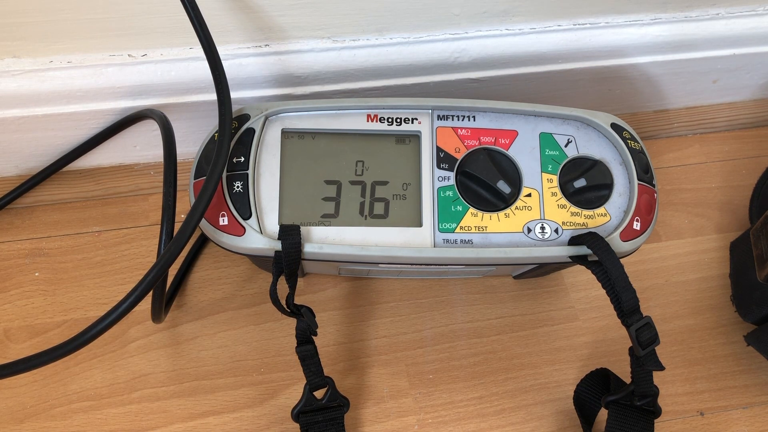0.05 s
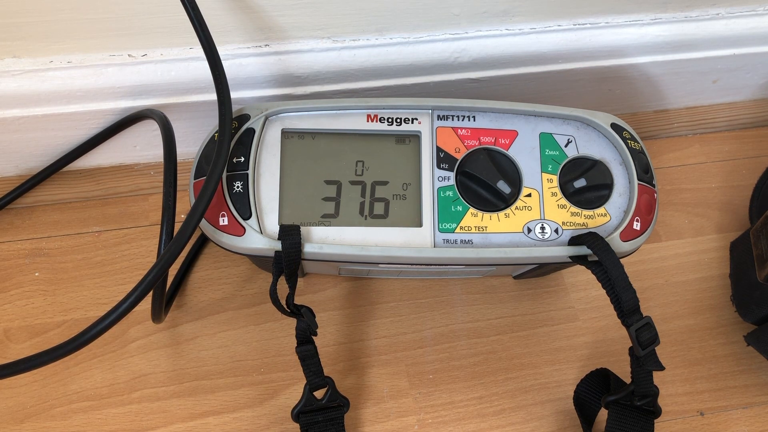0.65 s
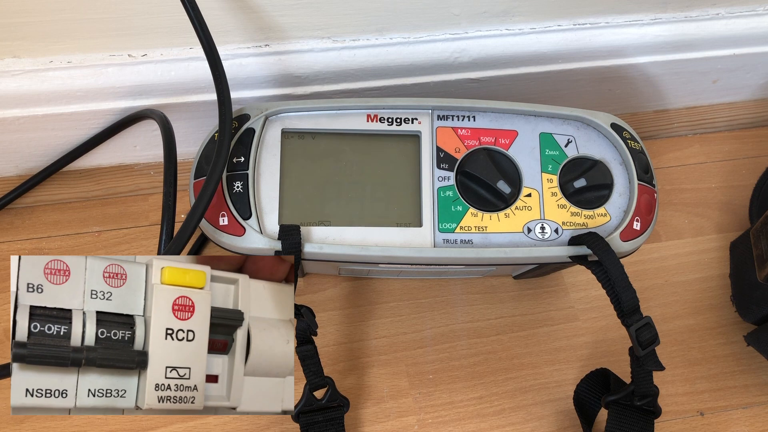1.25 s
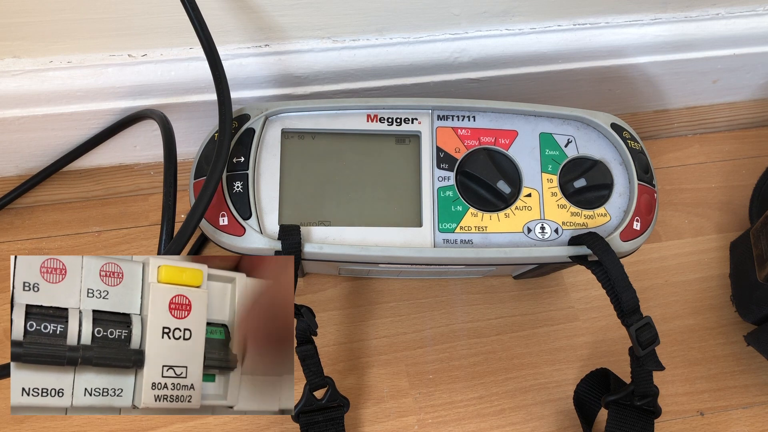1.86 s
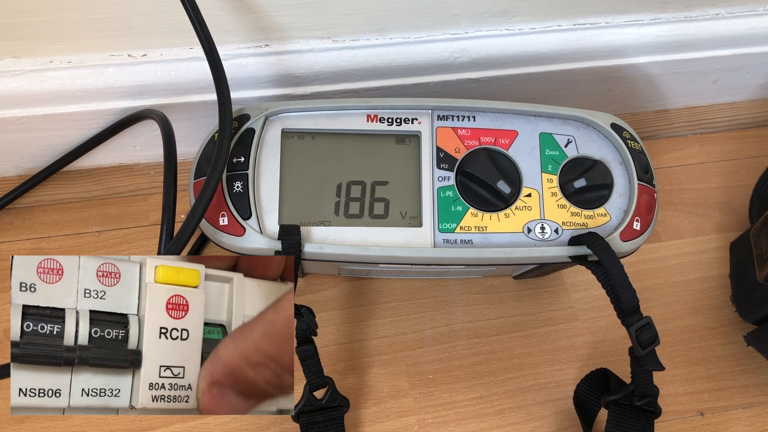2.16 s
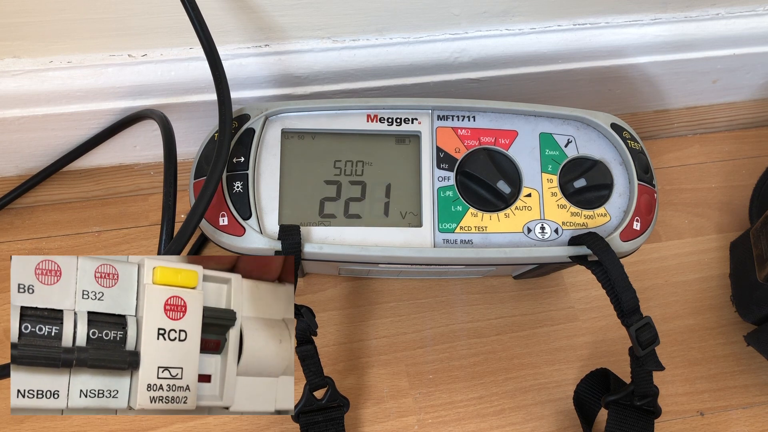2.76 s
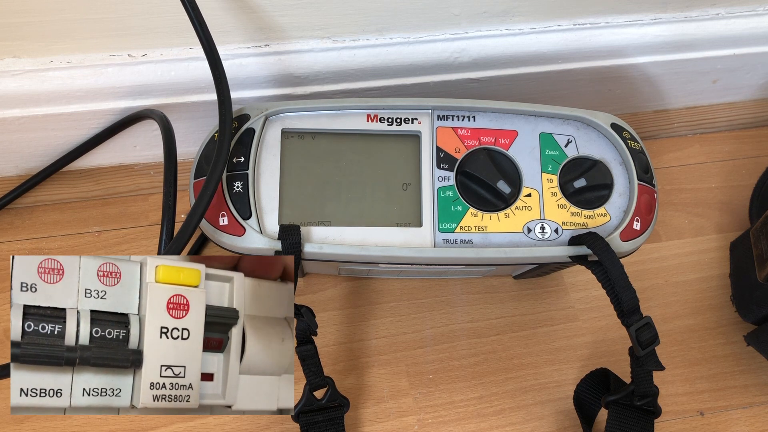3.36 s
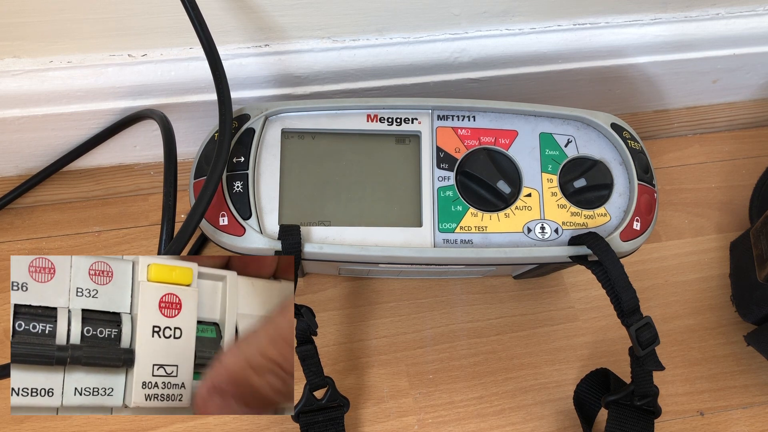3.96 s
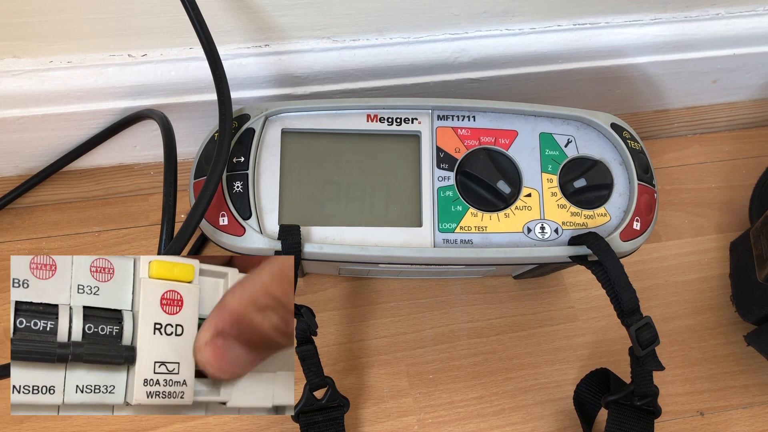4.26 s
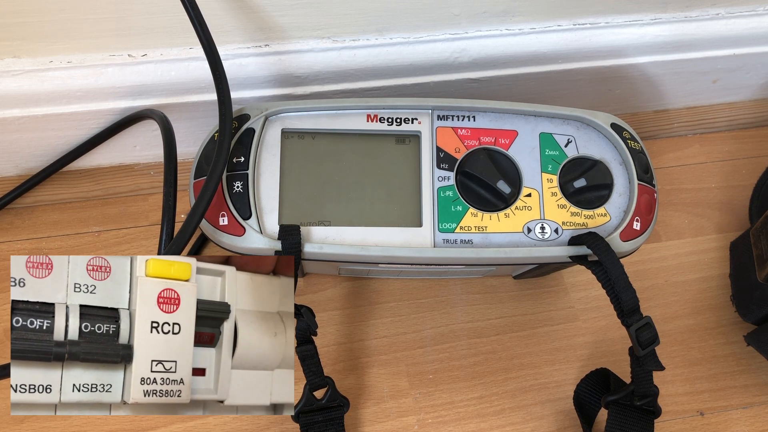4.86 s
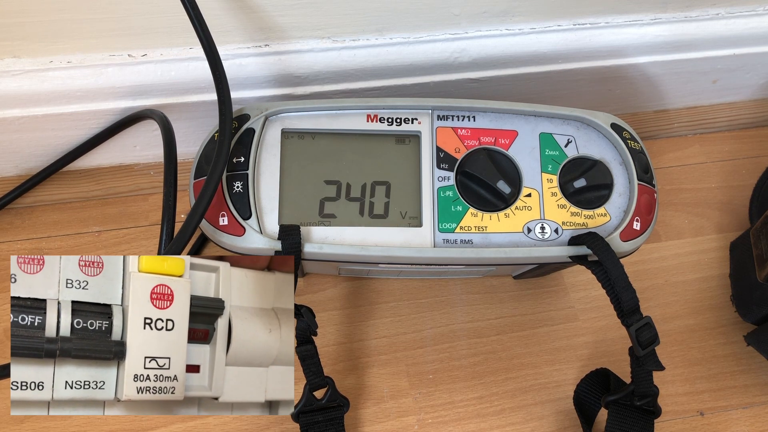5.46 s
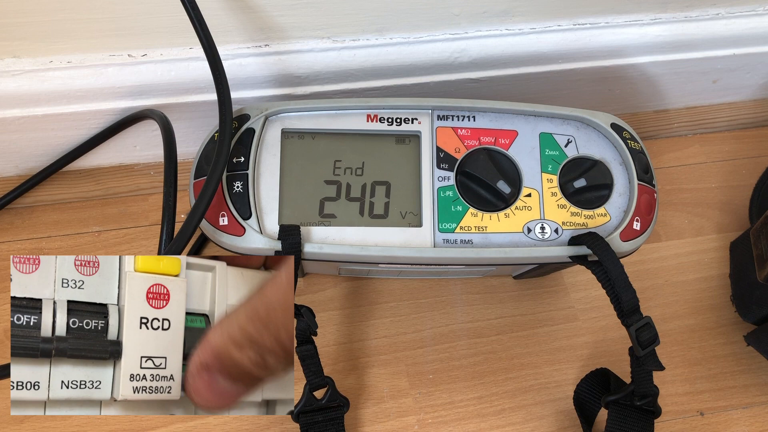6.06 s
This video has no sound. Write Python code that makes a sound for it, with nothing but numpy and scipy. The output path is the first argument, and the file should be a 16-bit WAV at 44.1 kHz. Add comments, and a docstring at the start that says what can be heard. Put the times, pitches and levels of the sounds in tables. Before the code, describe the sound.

In a bare, echoing room, a circuit breaker lever clicks and snaps on, then trips with a hard, ringing clack. It trips three times in all, and each time a hand clicks the lever down and snaps it back on. An electrical tester ticks softly near the microphone before each trip, while the breaker is some way off. Dull floor bumps come near the end, over faint hiss.

```python
"""Three hard clacks ring through a bare room: a residual-current breaker trips under test.
Its sprung contacts fly open and shake the wall; a hand clicks the lever down and snaps it back on.
The tester's relay ticks close by before each trip; the breaker is some way off.
A vehicle drones faintly outside. A body shifts on the floor and a sleeve rustles over steady hiss."""
import sys
import numpy as np
from scipy import signal
from scipy.fft import rfft, irfft
from scipy.io import wavfile

SR = 44100
rng = np.random.default_rng(int(sys.argv[2]) if len(sys.argv) > 2 else 0)


def bounce(signal):
    """Save signal as a 16-bit WAV file at the path given by the first command-line argument."""
    frames = np.transpose(np.atleast_2d(signal))
    limited = np.clip(frames, -1, 1)
    pcm = np.round(limited * 32767).astype(np.int16)
    wavfile.write(sys.argv[1], SR, pcm)


N = 269627

# Blows. Each row: start in seconds, level in dB, tilt in dB/octave, main ring in Hz, its lift in dB.
TRIPS = [(1.2434, -6, 0, 8640, 2.5), (3.2220, -6, 0, 9600, 1.5), (4.3270, -6.5, -0.13, 6370, 3.5)]  # contacts fly open
RESETS = [(.6072, -18, 0.9, 5270, 3.5), (2.0712, -19, 1.35, 4000, -1.5), (4.0910, -20, 0.2, 6650, 6.5),
          (5.1927, -21, 0, 2160, 3.5)]  # lever snaps on
LATCHES = [(0.258, -31, 0, 6350, 5), (1.829, -35, 0, 6400, 5), (3.715, -30, 0.012, 6500, 4),
           (4.935, -28.5, 0.007, 6460, 5)]  # lever pressed down until the latch catches
# Breaker's tensioned springs. Each row: frequency in Hz, level in dB, t60 in seconds.
SPRING_MODES = [(2223, -57.5, 0.5), (2236, -40, 0.56), (2373, -43, 0.54), (3485, -51, 0.78),
                (3780, -48.5, 0.76), (4030, -49.5, 0.58), (3940, -45.5, 0.74), (4030, -47, 1.0),
                (4740, -47, .9), (6600, -46.5, 0.99)]
# Room path of lever clicks and floor bumps: direct, early and tail level in dB.
FAR_PATH_DB = (-14, -8.5, -3)


def breaker_trips():
    """The latch slips, lets go, and the sprung arm hits its stop; the frame rings on."""
    # Clack spectrum. Each row: frequency in Hz, level in dB.
    colour = [(25, -44.5), (60, -11), (120, -8.5), (190, -12), (400, -14), (600, -9.5), (780, -14.5),
              (1050, -1), (1400, 3), (2800, -3), (6300, 0.5), (9000, -1), (13000, -5), (15500, 0.5)]
    # Case resonances. Each row: frequency in Hz, width in Hz, lift in dB.
    case_modes = [(480, 50, 5), (1264, 30, 3), (1421, 25, 4), (1670, 25, 4), (1838, 25, 3), (2010, 80, 3),
                  (2260, 180, -4), (2560, 200, 4), (2935, 50, 4), (3080, 260, -4), (3302, 30, 5),
                  (3389, 45, 5), (3680, 130, 3), (4380, 300, -2), (4820, 110, 4), (5190, 100, 3),
                  (5583, 35, 4), (5764, 35, 3), (5965, 70, 4), (6335, 40, 4), (7208, 50, 5),
                  (7550, 450, -4), (7982, 50, 6), (8490, 100, 4), (9250, 80, 5), (11850, 450, 4),
                  (13200, 900, -2), (14354, 30, 6)]
    # Slip, release, stop. Each row: delay in seconds, level in dB.
    contacts = [(-.0055, -5.5), (-.003, 1.5), (0, 10.5)]
    # Frame modes. Each row: frequency in Hz, level in dB, t60 in seconds.
    frame_modes = [(1421, -51, 1.2), (1490, -54, 1.2), (1670, -51, 1.2), (1838, -54, 1.1), (1986, -52, 1.1),
                   (2034, -52, 1.1), (2590, -50, 1.2), (3389, -50, 1.0), (3720, -50, 1.2), (5583, -49, .85),
                   (6335, -49, .8), (7984, -51, .65)]
    path_db = (-13, -5, -1.5)  # direct, early, tail
    blows = clacks(TRIPS, colour, case_modes, contacts, path_db, ring_width_hz=940)
    return blows + ring(TRIPS, frame_modes, spread_db=6.0)


def wall_shake(swell_s=0.038):
    """Each trip shakes the wall; its low modes swell and die away."""
    # Wall modes. Each row: frequency in Hz, level in dB.
    modes = [(58, -58.5), (92, -49.5), (108, -58), (128, -44.5)]
    out, t = np.zeros(N), np.arange(SR) / SR
    envelope = (t / swell_s) ** 2 * np.exp(-t / swell_s)
    for start_s, db, *_ in TRIPS:
        for (hz, mode_db), cycles in zip(modes, rng.random(len(modes))):
            add(out, start_s, amp(db + mode_db) * envelope * np.sin(2 * np.pi * (hz * t + cycles)))
    return out


def breaker_resets():
    """The contacts snap shut; the springs ring and the enclosure knocks hollow under the thumb."""
    # Snap spectrum. Each row: frequency in Hz, level in dB.
    colour = [(25, -22.5), (55, 4), (110, 7), (220, -6.5), (480, 0.5), (800, -8.5), (1100, -1.5),
              (1500, -4.5), (2300, -1.5), (4000, 0.5), (5800, -3), (8200, -6), (10800, -5), (15500, -11)]
    # Case resonances. Each row: frequency in Hz, width in Hz, lift in dB.
    case_modes = [(470, 70, 4), (1080, 150, 2), (1590, 140, -4), (2280, 260, 4), (2660, 260, -7),
                  (2960, 60, 7), (3130, 220, -6), (3480, 70, 4), (3750, 220, 4), (4070, 70, 3),
                  (4300, 60, 4), (4500, 200, -4), (4740, 90, 6), (5420, 250, -3), (6210, 50, 4),
                  (6560, 100, 3), (7210, 90, 6), (10350, 400, 2)]
    # One strike: delay in seconds, level in dB.
    contacts = [(0.00054, 10.57)]
    # Enclosure modes. Each row: frequency in Hz, level in dB, t60 in seconds.
    hollow_modes = [(435, -42.5, 0.49), (474.5, -40, 0.35), (510, -56.5, .55), (617, -46, 0.8),
                    (1073, -36, 0.4)]
    path_db = (-12, -8.5, -2)  # direct, early, tail
    snaps = clacks(RESETS, colour, case_modes, contacts, path_db, ring_width_hz=470)
    springs = ring(RESETS, SPRING_MODES, spread_db=-0.5)
    return snaps + springs + ring(RESETS, hollow_modes, spread_db=0.5)


def lever_clicks():
    """A finger takes up the lever's slack, then latches it, which rings the springs."""
    # Slack taken up. Columns as in TRIPS.
    nudges = [(.112, -37, 0, 10300, 8.8), (1.685, -34, 0, 10530, 7.4), (3.606, -36, 0, 10400, 8.9),
              (4.848, -32, 0.012, 6540, 4)]
    # Click spectrum. Each row: frequency in Hz, level in dB.
    colour = [(200, -3.5), (1000, -5.5), (2500, -2.5), (4500, -2), (7000, -5), (9000, -4), (12000, -7.5),
              (15500, -5.5)]
    # Lever resonances. Each row: frequency in Hz, width in Hz, lift in dB.
    modes = [(2215, 150, 1), (3740, 250, -4), (5090, 250, 2.5), (7000, 330, 6)]
    # Double strike. Each row: delay in seconds, level in dB.
    contacts = [(0, 5.4), (.005, 5.4)]
    clicks = clacks(nudges + LATCHES, colour, modes, contacts, FAR_PATH_DB, ring_width_hz=740)
    return clicks + ring(LATCHES, SPRING_MODES, spread_db=-0.5)


def tester_relay(spring_gain_db=3):
    """A near, dry tick: the armature bounces and leaves its spring ringing."""
    # Relay ticks. Columns as in TRIPS.
    blows = [(.9720, -44.5, 0.0097, 7500, 6), (2.9632, -44, 0.0069, 7223, 6), (4.0647, -44.5, 0, 7400, 6)]
    # Tick spectrum. Each row: frequency in Hz, level in dB.
    colour = [(300, -17.5), (1000, -5.5), (1900, 9), (3500, 2), (7000, -1.5), (9000, -6), (13000, -7),
              (15500, -16.5)]
    # Armature bounce. Each row: delay in seconds, level in dB.
    contacts = [(0, 5.1), (.002, 12)]
    # Spring modes. Each row: frequency in Hz, level in dB, t60 in seconds.
    spring = [(7250, -34, .42), (7470, -32, .45), (7610, -33, .42), (7830, -33, .42), (13050, -37, .25)]
    path_db = (2.5, -4, -3)  # direct, early, tail
    ticks = clacks(blows, colour, [], contacts, path_db, ring_width_hz=600)
    return ticks + amp(spring_gain_db) * ring(blows, spring, spread_db=0.5)


def floor_bumps(width_hz=60, lift_db=9):
    """A body shifts on the floor; dull thuds swell in the room's low modes."""
    # Each row: start in seconds, level in dB, boom in Hz.
    bumps = [(4.599, -29, 52), (5.83, -24, 132)]
    # Thud spectrum. Each row: frequency in Hz, level in dB.
    colour = [(25, -16), (52, -1), (90, -2.5), (135, -7.5), (200, -17), (500, -16.5), (2000, -36),
              (15000, -64)]
    out = np.zeros(N)
    for start_s, db, boom_hz in bumps:
        thud = impact(colour, [(boom_hz, width_hz, lift_db)], tilt_db=0)
        add(out, start_s, amp(db) * signal.fftconvolve(thud, room(*FAR_PATH_DB)))
    return out


def vehicle(waver=0.014, flutter_db=2.5, rumble_db=-12, overtone_db=-7.5, octave_db_per_db=0.4):
    """An engine passes beyond the walls: exhaust note, its octave, a drone and tyre noise."""
    # Engine pulls, then coasts. Each row: time in seconds, firing rate in Hz.
    firing = [(0.6, 42.2), (2.32, 47.8), (2.67, 56.0), (3.78, 66.1), (4.18, 59.87), (5.1, 40.72)]
    # Exhaust follows the throttle. Each row: time in seconds, level in dB.
    throttle = [(0.0, -72), (0.36, -64.5), (0.97, -71), (2.62, -73), (2.82, -64), (3.49, -79.5),
                (3.68, -60), (4.37, -60), (5.5, -78), (6.11, -80)]
    # Spectra. Each row: frequency in Hz, level in dB.
    rumble = [(25, -32), (42, -0.5), (70, -5), (140, -2.5), (300, -32.5), (1000, -81.5)]  # exhaust
    boom = [(25, -30), (110, -12), (160, -5), (180, -9), (205, 1), (228, -5), (255, 0), (275, -2), (302, 3),
            (325, -7), (400, -11), (600, -13), (1200, -35)]  # drone in the room's low modes
    tyres = [(200, -22), (400, 3), (750, -2.5), (1100, 0), (1700, 4), (2700, -3), (4000, -8),
             (15000, -61.5)]
    drift = [(4, 0), (12, -14), (40, -100)]  # slow wander of pitch and level
    firing_hz, exhaust_db = curve(firing), curve(throttle)
    phase = 2 * np.pi * np.cumsum(firing_hz * (1 + waver * noise(drift))) / SR

    def tone(order):
        """A multiple of the firing rate, fluttering in level."""
        return np.sqrt(2) * np.sin(order * phase) * amp(flutter_db * noise(drift))

    exhaust = amp(exhaust_db) * (tone(1) + amp(rumble_db) * noise(rumble))
    room_mode_db = resonance_db(2 * firing_hz, centre_hz=120, width_hz=12, lift_db=10)
    octave = amp(room_mode_db + octave_db_per_db * (exhaust_db - exhaust_db.max())) * tone(2)
    overtones = sum(amp(at_hz(boom, order * firing_hz)) * tone(order) for order in range(3, 8))
    drone = noise(boom) + amp(overtone_db) * overtones
    return (exhaust
            + octave * passing(peak_s=3.2, db=-64, approach_s=0.14, retreat_s=0.22)
            + drone * passing(peak_s=2.55, db=-69.5, approach_s=0.8, retreat_s=0.7)
            + noise(tyres) * passing(peak_s=3.4, db=-66.5, approach_s=1.1, retreat_s=0.62))


def sleeve_rustle():
    """Cloth noise swells and fades with each brush of a sleeve."""
    # Each row: peak time in seconds, level in dB, half length in seconds.
    brushes = [(0.153, -68.5, 0.36), (6.12, -65.5, 0.2)]
    # Cloth spectrum. Each row: frequency in Hz, level in dB.
    colour = [(100, 13.5), (700, 9.5), (2000, 6.5), (5000, 1), (10000, -6), (15500, -10)]
    t = np.arange(N) / SR
    envelope = sum(amp(db) * np.exp(-((t - peak_s) / half_s) ** 2) for peak_s, db, half_s in brushes)
    return envelope * noise(colour)


def hiss(level_db=-78):
    """Steady, bass-heavy background noise."""
    # Hiss spectrum. Each row: frequency in Hz, level in dB.
    colour = [(20, -24), (45, 6), (90, 6.5), (130, 17.5), (175, 4), (500, 1.5), (750, 3), (1100, -5.5),
              (3000, -11.5), (6000, -9.5), (15000, -17.5)]
    return amp(level_db) * noise(colour)


def clacks(blows, colour, modes, contacts, path_db, ring_width_hz):
    """Each blow strikes a body once per contact and sounds through the room."""
    out = np.zeros(N)
    for start_s, db, tilt_db, ring_hz, lift_db in blows:
        click = impact(colour, modes + [(ring_hz, ring_width_hz, lift_db)], tilt_db)
        for delay_s, contact_db in contacts:
            add(out, start_s + delay_s, amp(db + contact_db) * signal.fftconvolve(click, room(*path_db)))
    return out


def impact(colour, modes, tilt_db, size=4096):
    """Minimum-phase click: a broad spectrum, tilted per octave and lifted at each resonance."""
    hz = np.fft.rfftfreq(size, 1 / SR)
    db = at_hz(colour, hz) + tilt_db * np.log2((hz + 300) / 4000)
    db += sum(resonance_db(hz, *mode) for mode in modes)
    log_gain = np.log(amp(np.r_[db, db[-2:0:-1]]))
    spectrum = np.exp(np.conj(signal.hilbert(log_gain)))
    return unit(np.fft.ifft(spectrum).real)


def ring(blows, modes, spread_db, rise_s=0.012):
    """Decaying modes after each blow, random in level and phase."""
    out, t = np.zeros(N), np.arange(SR) / SR
    swell = 1 - np.exp(-t / rise_s)
    for start_s, db, *_ in blows:
        for (hz, mode_db, t60_s), (offset, phase) in zip(modes, rng.uniform(-1.1, 1, (len(modes), 2))):
            envelope = swell * amp(db + mode_db + spread_db * offset - 60 * t / t60_s)
            add(out, start_s, envelope * np.sin(2 * np.pi * hz * t + np.pi * phase))
    return out


def room(direct_db, early_db, tail_db, first_s=0.0044, last_s=0.016, beam_hz=1500):
    """Impulse response: direct sound, near-wall reflections, a tail whose treble dies first."""
    # Room decay. Each row: frequency in Hz, t60 in seconds.
    t60_s = [(100, 1.4), (500, 0.77), (1400, 1.18), (2700, 1.23), (4000, 1.007), (6000, 0.85), (8000, 0.68),
             (11000, 0.54), (15500, 0.37)]
    t = np.arange(3 * SR // 2) / SR
    hz, frame_s, bands = signal.stft(rng.standard_normal(len(t)), SR, nperseg=256)
    build = (1 - np.exp(-frame_s / (0.0018 + 2.2 / (hz[:, None] + 50)))) ** 2  # low modes fill slowly
    decay = amp(-60 * frame_s / at_hz(t60_s, hz)[:, None])
    tail = signal.istft(bands * build * decay, SR, nperseg=256)[1][:len(t)]
    early = rng.standard_normal(len(t)) * ((t > first_s) & (t < last_s))
    direct = rng.standard_normal(len(t)) * np.exp(-t / 0.0021)  # smeared by the source's box
    near = amp(direct_db) * unit(direct) + amp(early_db) * unit(early)
    # a small source beams its treble; its bass arrives through the tail
    near = signal.lfilter(*signal.butter(1, beam_hz, "high", fs=SR), near)
    return near + amp(tail_db) * unit(tail)


def passing(peak_s, db, approach_s, retreat_s):
    """Gain of a source going by on a straight road: one over distance."""
    t = np.arange(N) / SR - peak_s
    return amp(db) / np.hypot(1, t / np.where(t < 0, approach_s, retreat_s))


def resonance_db(hz, centre_hz, width_hz, lift_db):
    """Bell-shaped lift around one mode."""
    return lift_db / (1 + (2 * (hz - centre_hz) / width_hz) ** 2)


def noise(colour):
    """Unit-rms noise with a given spectrum."""
    shaped = rfft(rng.standard_normal(N)) * amp(at_hz(colour, np.fft.rfftfreq(N, 1 / SR)))
    return unit(irfft(shaped, N)) * np.sqrt(N)


def amp(db):
    """Decibels to gain."""
    return 10 ** (np.asarray(db) / 20)


def unit(x):
    """Scales to unit energy."""
    return x / np.sqrt(np.sum(x ** 2) + 1e-20)


def at_hz(points, hz):
    """Interpolates a table over log frequency."""
    points_hz, values = np.transpose(points)
    return np.interp(np.log(hz + 1), np.log(points_hz + 1), values)


def curve(points):
    """Interpolates a timed table, one value per sample."""
    return np.interp(np.arange(N) / SR, *np.transpose(points))


def add(mix, start_s, sound):
    """Mixes a sound in at start_s."""
    part = mix[round(start_s * SR):][:len(sound)]
    part += sound[:len(part)]


def scene():
    """All sources in mono, heard from beside the tester."""
    breaker = breaker_trips() + wall_shake() + breaker_resets() + lever_clicks()
    return (breaker + tester_relay() + floor_bumps() + vehicle() + sleeve_rustle() + hiss())[None]


def record(dry):
    """Steep low-pass at the top of the treble."""
    edge_hz = 15850
    taps = signal.firwin(401, edge_hz, window=("kaiser", 8), fs=SR)
    return signal.oaconvolve(dry, taps[None], "same")


dry = scene()
out = record(dry)
bounce(out)
```